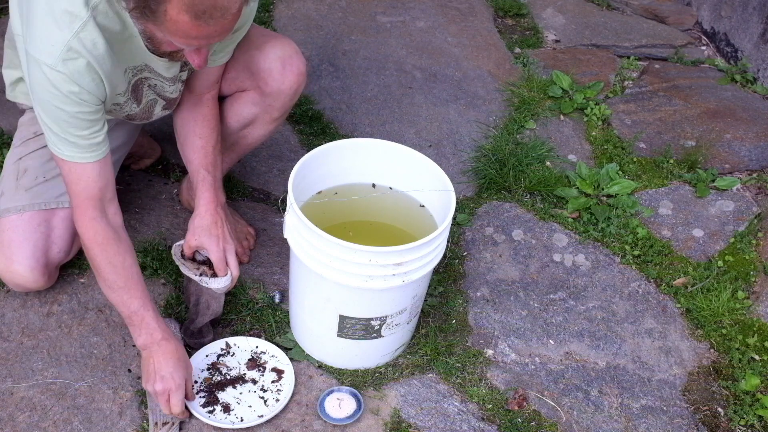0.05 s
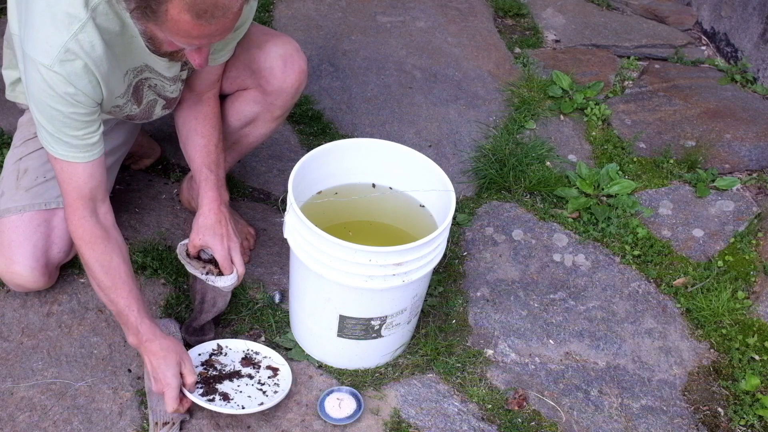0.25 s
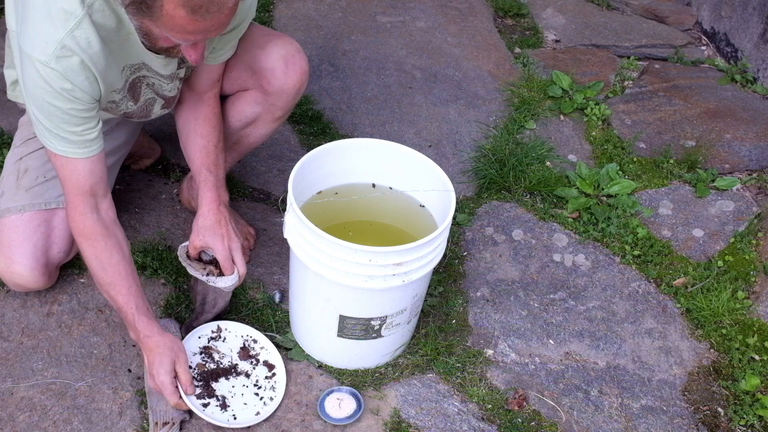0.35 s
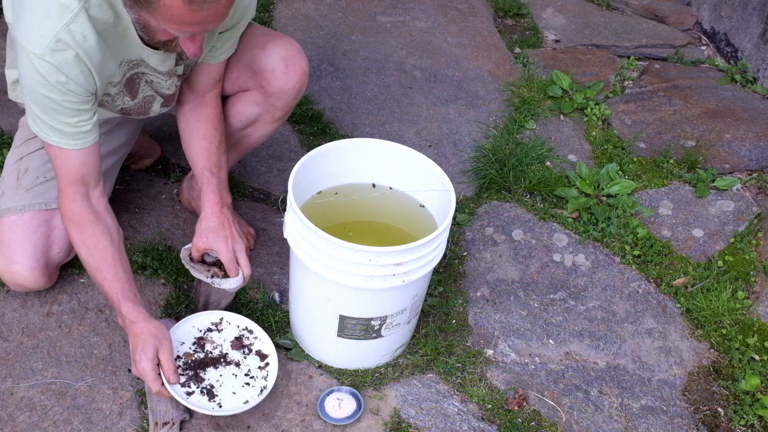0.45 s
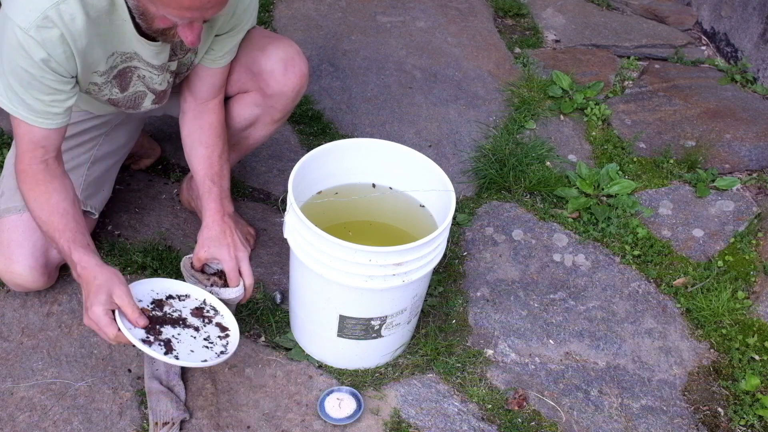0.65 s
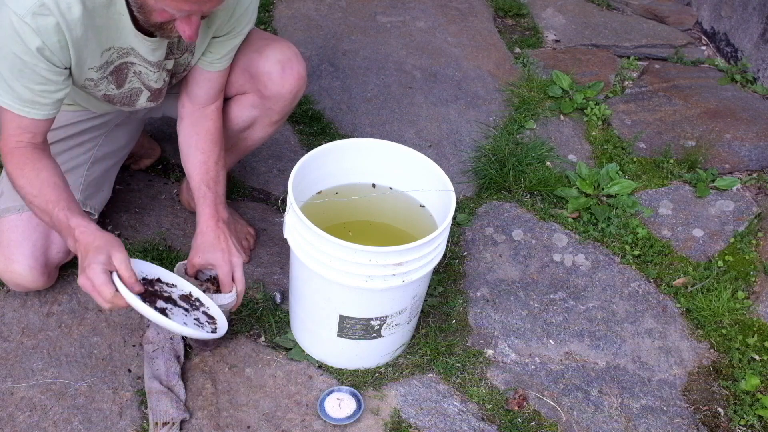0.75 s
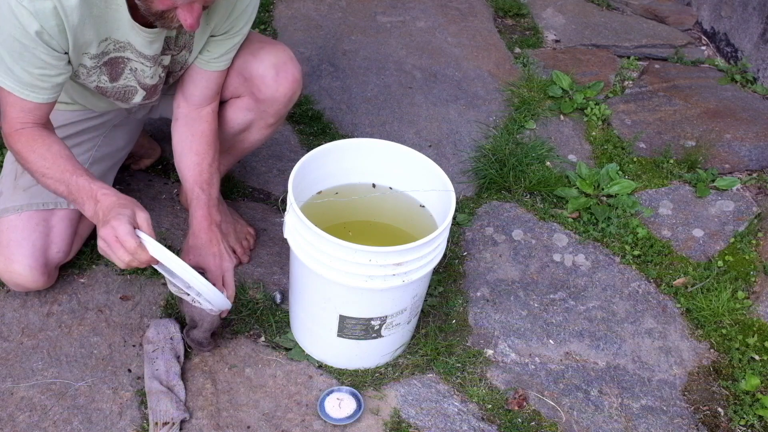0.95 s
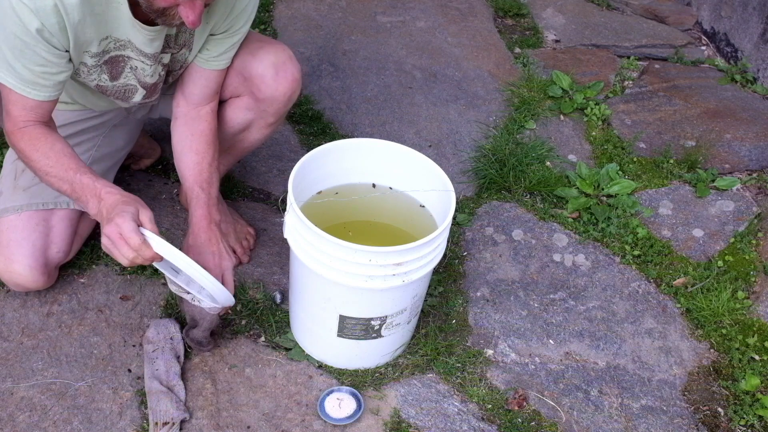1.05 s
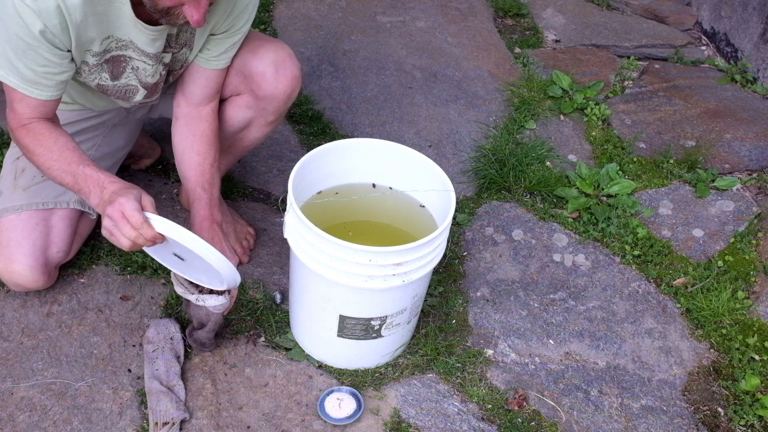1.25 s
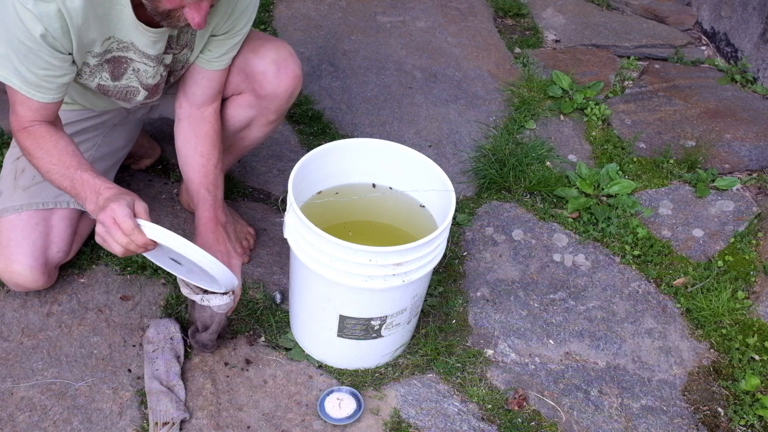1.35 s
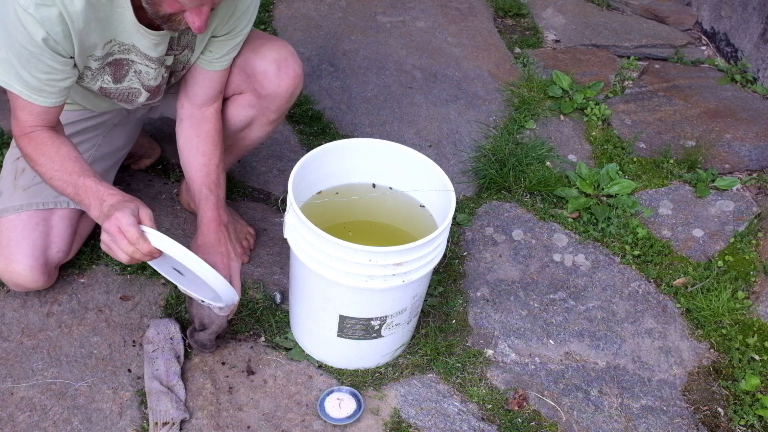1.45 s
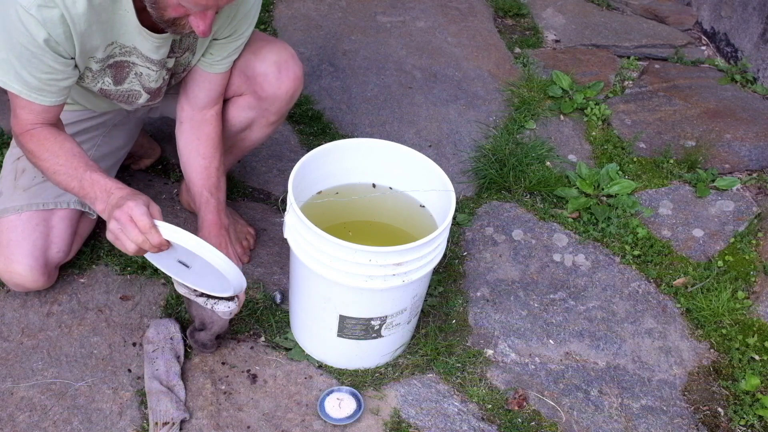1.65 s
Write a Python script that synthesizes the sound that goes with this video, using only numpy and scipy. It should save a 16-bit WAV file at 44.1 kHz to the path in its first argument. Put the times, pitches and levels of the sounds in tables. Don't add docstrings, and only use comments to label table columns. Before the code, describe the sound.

A ceramic plate is dragged and tipped off stone paving, with a quick cluster of dull knocks, crackling grit and a short ringing note, then faint grain ticks and cloth rustle over soft outdoor hiss, close microphone.

```python
import sys
import numpy as np
from scipy import signal
from scipy.fft import rfft, irfft
from scipy.io import wavfile

SR = 44100
rng = np.random.default_rng(int(sys.argv[2]) if len(sys.argv) > 2 else 0)


def materialize(psi):
    bounded = np.clip(np.atleast_2d(psi).T, -1, 1)
    quanta = np.round(bounded * 32767).astype(np.int16)
    wavfile.write(sys.argv[1], SR, quanta)


def makeup_ratio(level_db):
    decades = np.asarray(level_db, float) / 20
    return 10 ** decades


N = 74970

# start_s, peak_db, pitch_hz
KNOCK_EVENTS = [(0.144, -28.5, 800), (0.1523, -28, 1470), (0.1642, -28, 910), (0.1774, -29, 1141),
                (0.2178, -25.5, 750), (0.219, -30.5, 705), (0.2383, -19, 820), (0.243, -20.5, 1090),
                (0.2555, -11, 970), (0.262, -6, 1230), (0.2689, -13, 1090), (0.2846, -7, 1334),
                (0.3008, -13, 860), (0.3083, -24, 1060), (0.3186, -25, 800), (0.325, -18, 940),
                (0.3422, -29, 910), (0.3627, -16.5, 750), (0.3771, -9.5, 870), (0.3784, -11.5, 910),
                (0.391, -14, 810), (0.4116, -16, 795), (0.414, -25, 840)]


def rms_one(x):
    return x / np.sqrt(np.mean(x ** 2) + 1e-20)


def at_hz(points, hz):
    table = np.array(points)
    return np.interp(np.log(hz), np.log(table[:, 0]), table[:, 1])


def bins_hz():
    return np.maximum(np.arange(N // 2 + 1) * SR / N, 1)


def colour(x, spectrum):
    return rms_one(irfft(rfft(x) * makeup_ratio(at_hz(spectrum, bins_hz())), N))


def pan(x, db):
    left, right = makeup_ratio(db / 2), makeup_ratio(-db / 2)
    return np.array([[left], [right]]) * x * 2 / (left + right)


def band(x, order, hz, kind):
    return signal.sosfilt(signal.butter(order, hz, kind, fs=SR, output="sos"), x)


def air():
    # freq_hz, density_db_per_hz
    hiss_spectrum = [(25, -13), (60, -4), (300, -3), (750, -5.5), (1200, -11), (3000, -15), (8000, -24),
                     (15600, -29.5)]
    # freq_hz, likeness_0_to_1
    likeness = [(60, 0.35), (290, 0.51), (640, 0.61), (1400, 0.28), (3000, 0.25), (8000, .05)]
    level_db, pan_db = -53 + 0.5, 1.0
    alike = np.clip(at_hz(likeness, bins_hz()), 0, 1)
    mid, side = rfft(rng.standard_normal((2, N)))
    both = irfft(np.sqrt(1 + alike) * mid + np.sqrt(1 - alike) * side * [[1], [-1]], N)
    return pan(makeup_ratio(level_db) * colour(both, hiss_spectrum), pan_db)


def rustles():
    # middle_s, half_length_s, level_db
    moves = [
        (0.57, 0.019, -58),
        (1.065, 0.043, -59),
        (1.278, 0.043, -65),
        (1.352, 0.019, -63),
        (1.523, .03, -72),
    ]
    # freq_hz, density_db_per_hz
    cloth_spectrum = [(1500, -12), (3500, 4.5), (7000, -4), (12000, 3.5), (15500, -12)]
    t = np.arange(N) / SR
    swell = sum(makeup_ratio(db) * np.exp(-((t - middle) / half) ** 2) for middle, half, db in moves)
    fibres = rng.standard_normal((3, N)) * makeup_ratio(2.0 * rng.exponential(1, N))
    return swell * colour(fibres[0] + 0.91 * fibres[1:], cloth_spectrum)


def ticks():
    # start_s, peak_db, pitch_hz
    grains = [(0.5635, -53, 14500), (0.5648, -54, 11500), (0.566, -52, 13300), (0.57, -56, 10300),
              (1.283, -53, 11000), (1.292, -58, 11000), (1.3087, -41, 11000), (1.3096, -41, 11400),
              (1.3132, -46, 11800), (1.3395, -44, 12600), (1.3443, -57, 5200), (1.357, -48.5, 11200),
              (1.505, -53, 13000)]
    half_s, crack_share, crack_low_hz = 0.0006, 0.6, 9000
    t, out = np.arange(N) / SR, np.zeros(N)
    crack = band(rng.standard_normal(N), 3, crack_low_hz, "high")
    for start, db, hz in grains:
        body = np.sin(2 * np.pi * hz * t) + crack_share * crack
        out += makeup_ratio(db) * np.exp(-((t - start) / half_s) ** 2) * body
    return out


def yard(x):
    # delay_s, level_db
    echoes = [
        (.0021, -13.5),
        (.0045, -16),
        (.009, -24),
        (.016, -19),
        (.03, -17),
    ]
    echo_cut_hz, tail_db, tail_t60_s, tail_len = 1600, -22 - 14.5, 0.21, 9000
    dull = signal.lfilter(*signal.butter(1, echo_cut_hz, fs=SR), x)
    out = np.zeros((2, N))
    for delay, db in echoes:
        for side in range(2):
            lag = int(delay * rng.uniform(0.93, 1.05) * SR)
            out[side, lag:] += makeup_ratio(db) * dull[:N - lag]
    noise = rng.standard_normal((3, tail_len))
    decay = makeup_ratio(tail_db - 60 * np.arange(tail_len) / SR / tail_t60_s)
    tail = (noise[0] + 0.5 * noise[1:]) * decay
    return out + signal.fftconvolve(dull[None], tail, axes=1)[:, :N]


def grit():
    # time_s, level_db
    drag = [
        (.11, -71),
        (0.142, -47),
        (0.179, -45),
        (0.204, -58),
        (0.239, -41),
        (0.259, -37),
        (.34, -41),
        (.4, -37),
        (0.471, -55),
    ]
    # freq_hz, density_db_per_hz
    grit_spectrum = [(200, -21), (700, -4.5), (1800, -4), (3000, -12.5), (3600, -18), (9000, -34),
                     (13000, -30), (16000, -55)]
    clicks_per_s = 3 * 2300
    sizes = makeup_ratio(3.1 * np.minimum(rng.exponential(1, N), 3)) * rng.choice([-1, 1], N)
    clicks = (rng.random(N) < clicks_per_s / SR) * sizes
    time_s, db = np.transpose(drag)
    level = makeup_ratio(np.interp(np.arange(N) / SR, time_s, db, -120, -120))
    return level * colour(clicks, grit_spectrum)


def slab():
    slab_hz, slab_db, t60_s, db_per_octave, size = 225, -14 - 14.0, 0.05, -11, 4000
    t, out = np.arange(size) / SR, np.zeros(N + size)
    for start, db, hz in KNOCK_EVENTS:
        level_db = db + slab_db + db_per_octave * np.log2(hz / 900)
        i = int(start * SR)
        out[i:i + size] += makeup_ratio(level_db - 60 * t / t60_s) * np.sin(2 * np.pi * slab_hz * t)
    return band(out[:N], 2, [150, 450], "band")


def knocks():
    level_db, half_cycles, tail_stretch = -0.8, 0.45, 1.83
    snap_hz, snap_half_s, snap_share = 2100, 0.00032, 0.45
    out, t = np.zeros(N), np.arange(-300, 600) / SR
    snap = np.exp(-(t / snap_half_s) ** 2) * np.sin(2 * np.pi * snap_hz * t)
    for start, db, hz in KNOCK_EVENTS:
        width_s = half_cycles / hz * np.where(t > 0, tail_stretch, 1)
        body = np.exp(-(t / width_s) ** 2) * np.sin(2 * np.pi * hz * t)
        i = int(start * SR)
        out[i - 300:i + 600] -= makeup_ratio(db + level_db) * (body + snap_share * min(hz / 1100, 1.3) * snap)
    return band(out, 2, 250, "high")


def plate(touches, modes, spread, size, struck=False):
    scatter_db, rise_s, flutter, lift_s = 3.5, 0.00018, 0.9, 0.412
    left_lead_rad, lag_rad = 0.43, 0.75
    rows, t = np.array(touches), np.arange(size) / SR
    last = np.searchsorted(rows[:, 0], t) - 1
    age_s = np.where(last < 0, 9, t - rows[last, 0])
    start_s = lift_s
    if struck:
        blows_s = np.array(KNOCK_EVENTS)[:, 0]
        nearest = np.abs(rows[:, :1] - blows_s).argmin(axis=1)
        start_s = blows_s[nearest][last]
    scatter = rng.standard_normal((len(rows), len(modes)))
    turns_rad = rng.uniform(-1.6, 1, len(modes))
    rub = rng.standard_normal((len(modes), 2, size // 128 + 2))
    smooth = np.exp(-1 / (rise_s * SR))
    out = np.zeros((2, N))
    for k, (hz, db, t60_s, side_db, column) in enumerate(modes):
        touch_db = rows[:, 1 + int(round(column))] + scatter_db * spread * scatter[:, k]
        level_db = touch_db[last] + db - 60 * age_s / t60_s
        slow = np.array([np.interp(t * SR / 128, np.arange(len(r)), r) for r in rub[k]])
        swell, sway_rad = flutter * spread * slow
        phase_start_s = start_s if column < 0.5 else lift_s
        state = makeup_ratio(level_db) * np.exp(-2j * np.pi * hz * phase_start_s)
        level = signal.lfilter([(1 - smooth) ** 2], [1, -2 * smooth, smooth ** 2], state) * (1 + swell)
        lead_rad = (left_lead_rad / 2 + spread * turns_rad[k]) * np.array([[1], [-1]])
        turn = np.exp(1j * (2 * np.pi * hz * t + sway_rad + lead_rad - lag_rad))
        out[:, :size] -= pan(np.imag(level * turn), side_db)
    return out


def rings():
    # start_s, main_db, low_db, third_db, fourth_db
    touches = [(0.012, -64, -67.0, -78, -58), (0.122, -65, -70, -74.0, -52.5),
               (0.1435, -46, -43, -58, -43.5), (0.1518, -37.5, -44, -57, -42), (0.164, -43, -41, -59, -47),
               (0.177, -40, -46, -52, -43), (0.2174, -36.5, -47, -43.5, -53), (0.238, -33, -49, -37, -50),
               (0.2427, -30, -48, -30.5, -27.5), (0.2551, -17.5, -36, -33, -31),
               (0.2618, -12.5, -38, -23.5, -24.5), (0.2686, -12.5, -40, -21.5, -26),
               (0.2843, -24, -44, -22.5, -29), (0.3005, -23, -44, -24.5, -34),
               (0.3088, -27, -43, -25.5, -36), (0.3183, -43, -42, -28.5, -39),
               (0.3247, -16.5, -40, -31, -21), (0.333, -19, -40, -31, -36), (0.342, -27, -42, -34.5, -44),
               (0.3623, -29, -34, -36, -28), (0.3783, -19, -25, -38, -26.5),
               (0.3907, -15.5, -26.5, -60, -38), (0.4116, -21, -23, -55, -33)]
    # start_s, 4_8khz_db, 5_5khz_db, 5_9khz_db, 7khz_db
    edges = [(0.012, -72, -69, -76, -82), (0.122, -66, -66, -74, -80), (0.143, -53, -63, -65, -71),
             (0.172, -61, -55, -57, -68), (0.217, -52.5, -76, -71, -54), (0.238, -45, -62, -48, -52),
             (0.254, -32, -65, -53, -44.5), (0.269, -36, -58, -52, -49), (0.285, -42, -59, -65, -50.5),
             (0.301, -42, -70, -58, -51.5), (0.325, -32.5, -49, -49, -48), (0.343, -38, -57, -69, -53),
             (0.362, -36.5, -64, -52, -49), (0.377, -36.5, -46, -49, -48), (0.391, -40.5, -52, -49, -55),
             (0.409, -48, -52, -67, -43), (0.428, -54, -72, -76, -72)]
    # start_s, 9khz_db, 10_and_12khz_db, 11khz_db, 13_and_14khz_db
    rim = [(0.012, -84, -67.5, -76, -84), (0.125, -80, -65, -72, -74), (0.143, -80, -64, -68, -71),
           (0.172, -78, -66, -69, -72), (0.217, -79, -66, -68, -80), (0.238, -66, -58, -53.5, -68),
           (0.252, -53, -53, -56, -49), (0.269, -56, -55, -66, -61), (0.289, -63, -69, -54, -62),
           (0.301, -72, -68, -54, -66), (0.325, -50, -48.5, -57, -62), (0.333, -55, -45.5, -56, -51),
           (0.362, -53.5, -60, -60, -63), (0.377, -49, -66, -59, -57), (0.391, -47, -60, -48, -62),
           (0.409, -49.5, -50, -51, -57), (0.432, -64, -68, -72, -80)]
    # freq_hz, level_db, t60_s, left_right_db, touch_column (rounded)
    low_modes = [(1354, -4, 0.22, 5.5, 0), (1343.3, -7.5, 0.3, 4.5, 0), (1352, -33, 1.4, -1, 0),
                 (991, -0.4, 0.21, 1.5, 1), (2360, 1, 0.23, 4, 2), (2681, 0.5, 0.19, 7.5, 3),
                 (2730, -7, 0.12, 5, 3)]
    high_modes = [(4765, 0.1, 0.18, 12.5, 0), (4130, -13.5, 0.08, 4, -0.5), (3690, -7, 0.09, 6, 1.5),
                  (5530, 3, 0.13, 14, 1), (7870, -1.5, 0.11, 16, 1.5), (8290, -1, 0.093, 8, 2),
                  (5900, 2, 0.13, 15, 2), (7055, 2, 0.19, 12.5, 3)]
    top_modes = [(9400, 4, 0.15, 8, 0), (10380, 1.5, 0.13, 15, 1), (10300, -3, 0.1, 12, 1),
                 (11800, -2, 0.13, 15, 1), (10800, 2, 0.13, 15, 2), (11000, 0, 0.1, 12, 2),
                 (12900, 3, 0.1, 11, 3), (13200, 1.5, 0.08, 11, 3), (13900, 1.5, 0.08, 10, 3),
                 (14200, -1, 0.08, 10, 3)]
    low = plate(touches, low_modes, spread=0.11, size=44000, struck=True)
    high = plate(edges, high_modes, spread=0.35, size=24000)
    top = plate(rim, top_modes, spread=0.52, size=24000)
    return low + high + top


def scene():
    small = pan(ticks() + rustles(), 15)
    stone = knocks() + grit()
    contact = pan(stone + slab(), 2) + yard(stone) + rings()
    return band(contact, 2, 120, "high") + small + air()


def roll_off(x):
    return signal.sosfilt(signal.butter(12, 15760, fs=SR, output="sos"), x)


def record(dry):
    stop_hz = 15750 + 450
    lagged = np.array([dry[0], np.roll(dry[1], 1)])
    mix = signal.sosfilt(signal.cheby2(12, 60, stop_hz, fs=SR, output="sos"), lagged)
    return roll_off(mix)


dry = scene()
out = record(dry)
materialize(out)
```